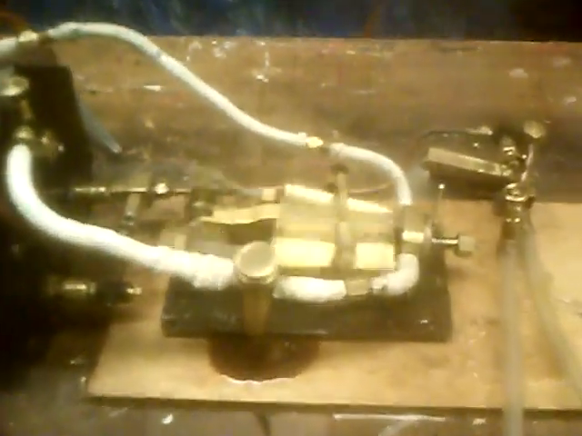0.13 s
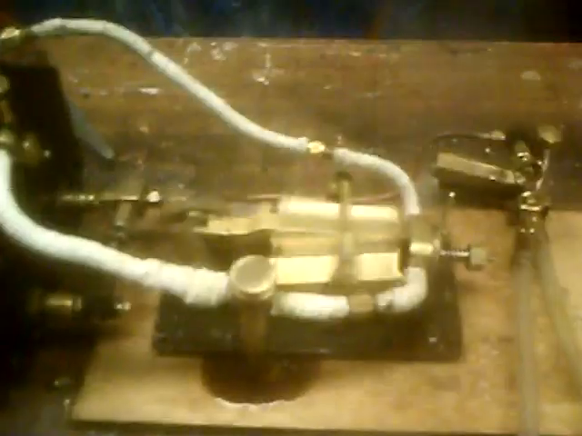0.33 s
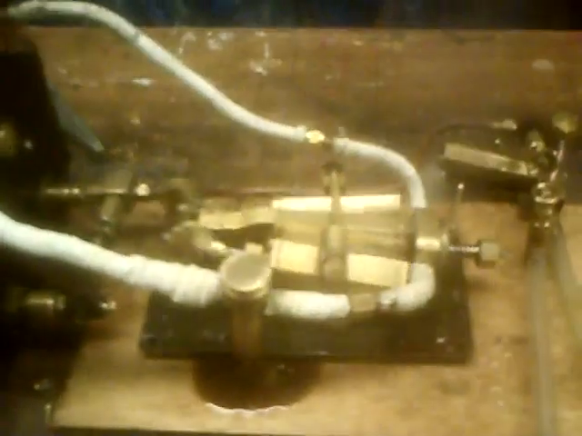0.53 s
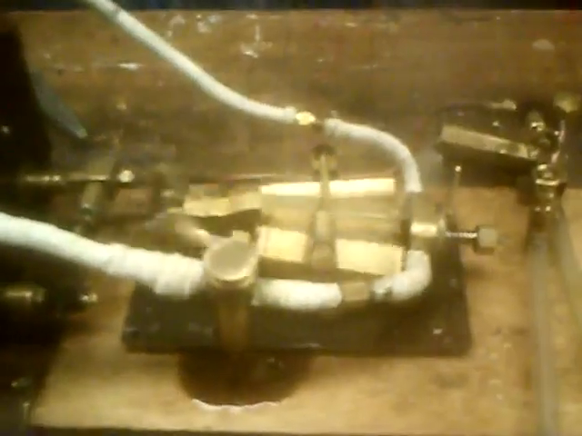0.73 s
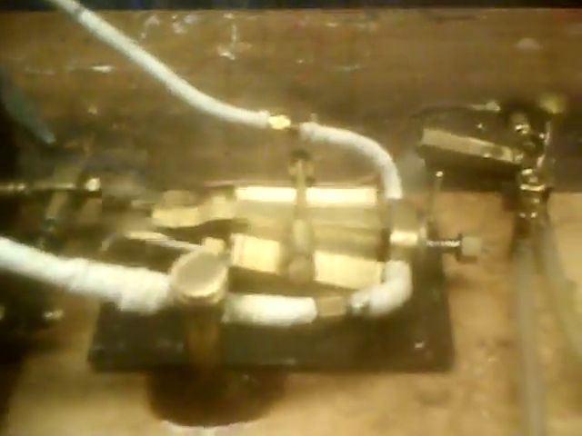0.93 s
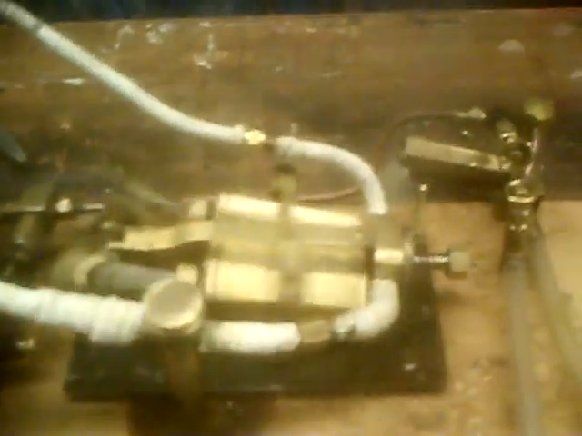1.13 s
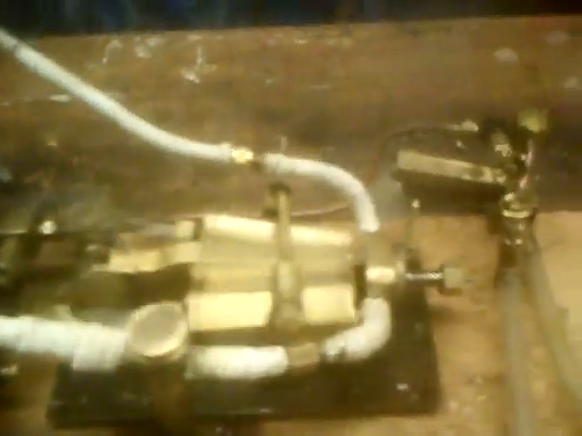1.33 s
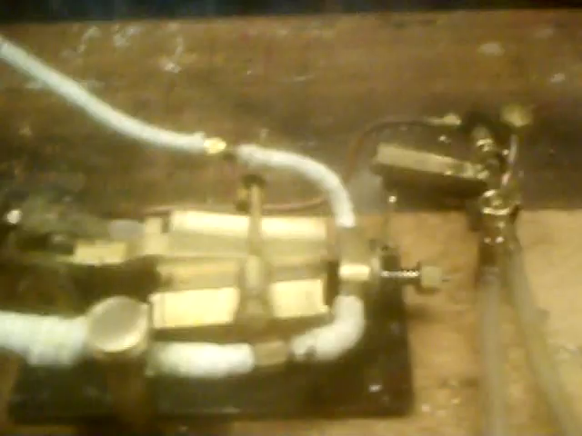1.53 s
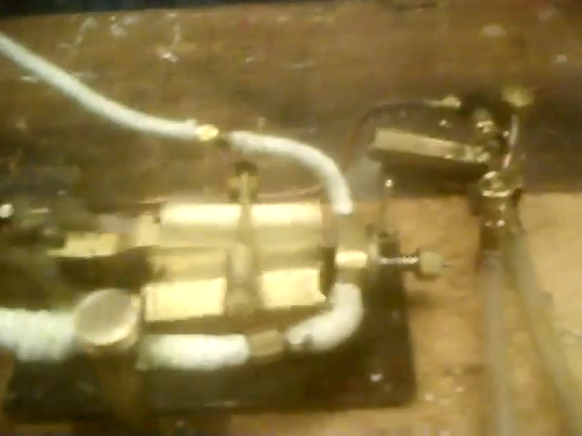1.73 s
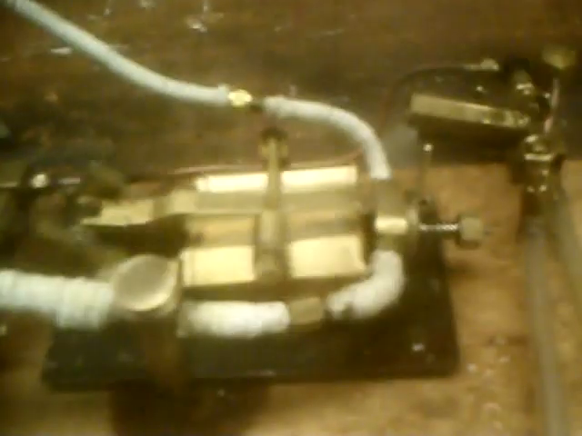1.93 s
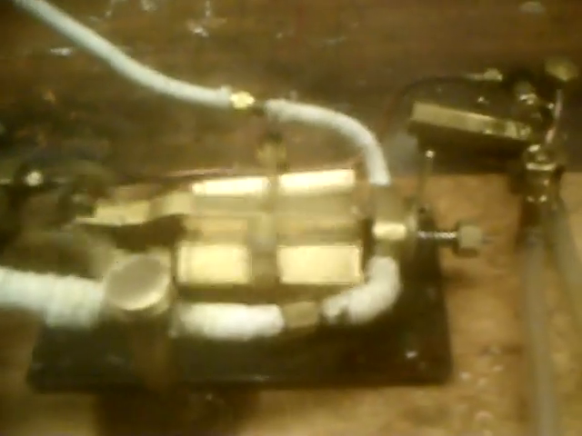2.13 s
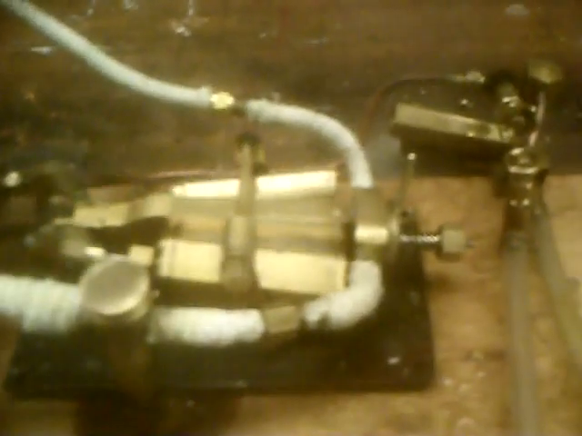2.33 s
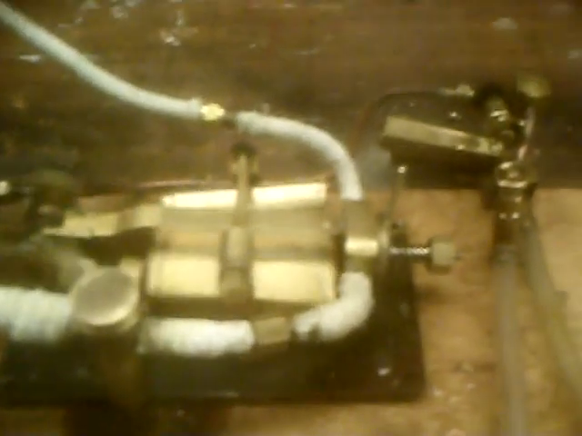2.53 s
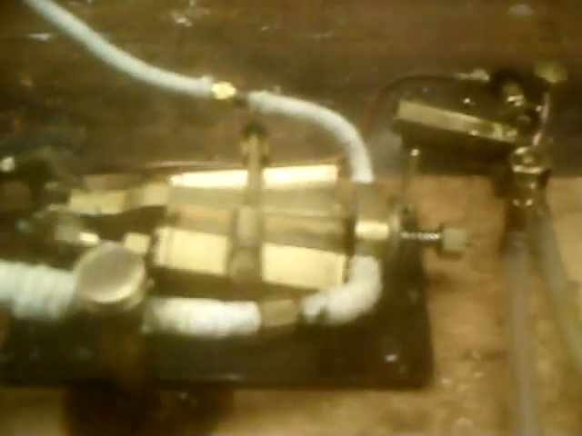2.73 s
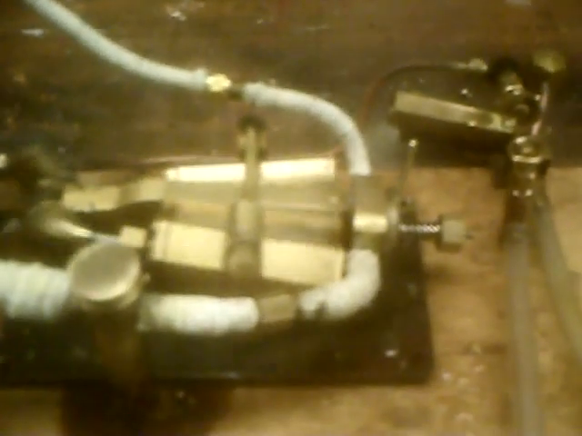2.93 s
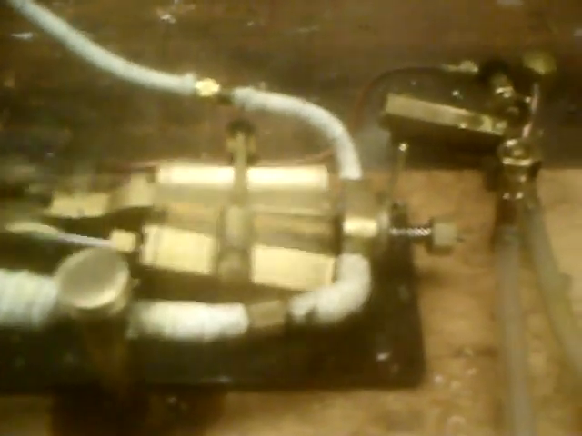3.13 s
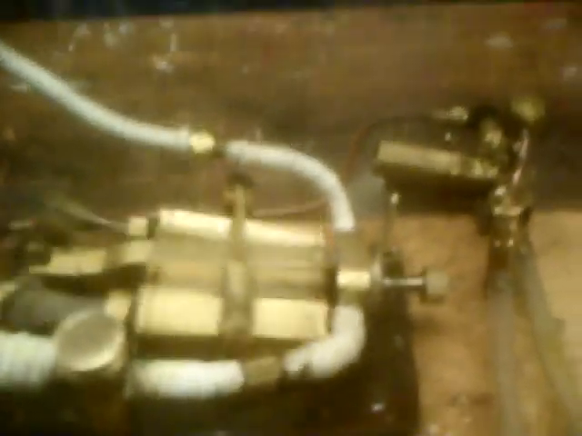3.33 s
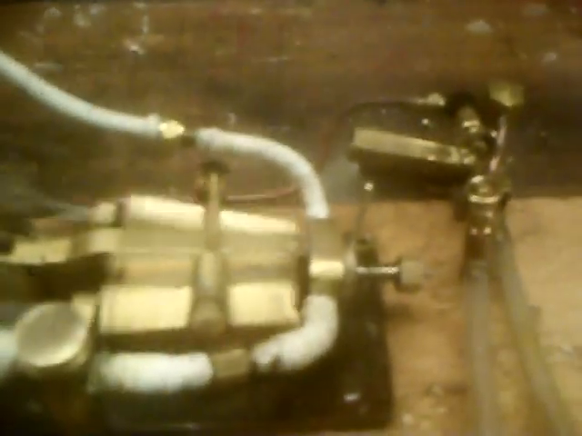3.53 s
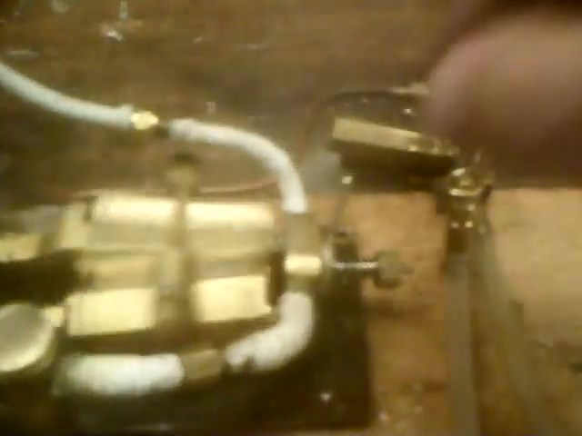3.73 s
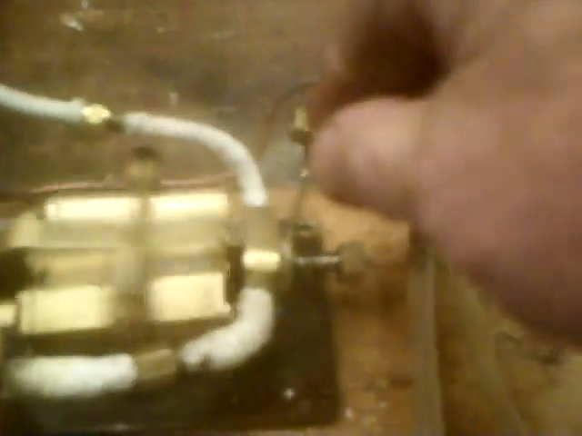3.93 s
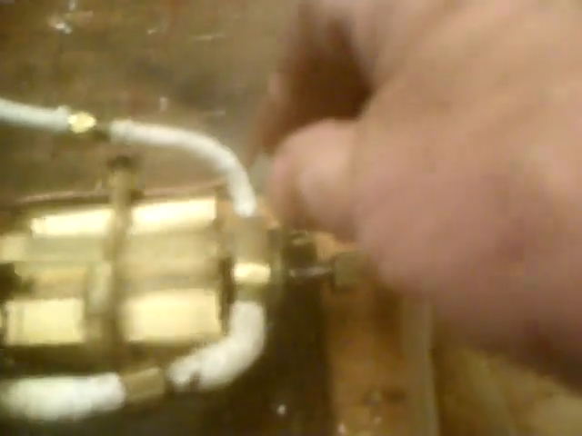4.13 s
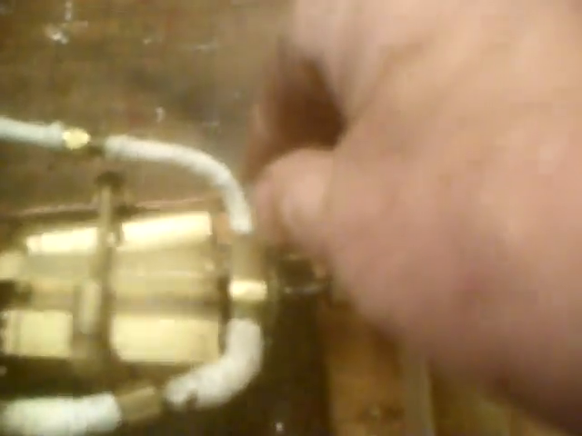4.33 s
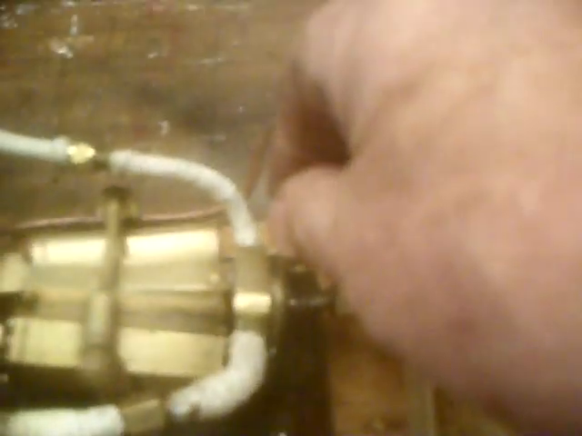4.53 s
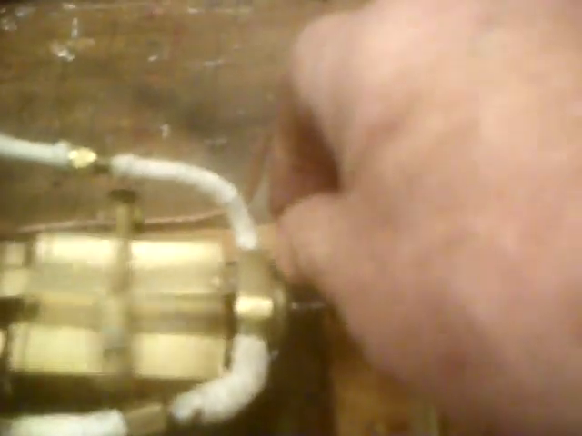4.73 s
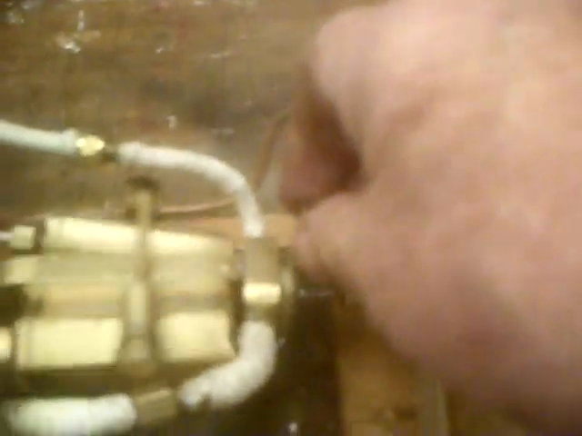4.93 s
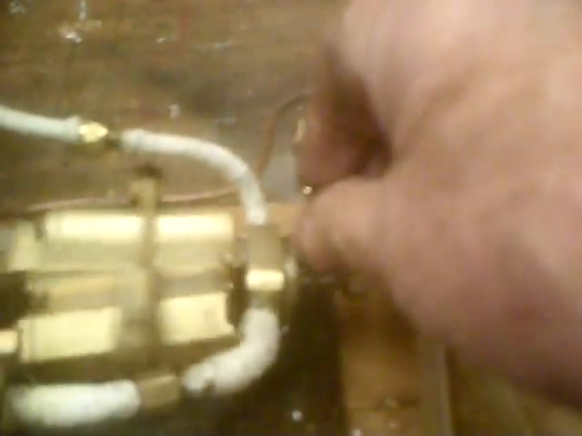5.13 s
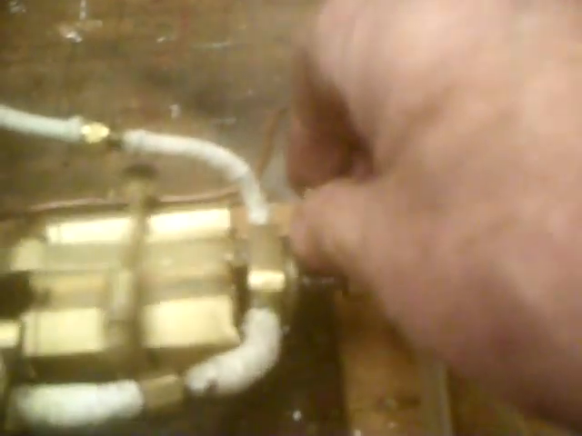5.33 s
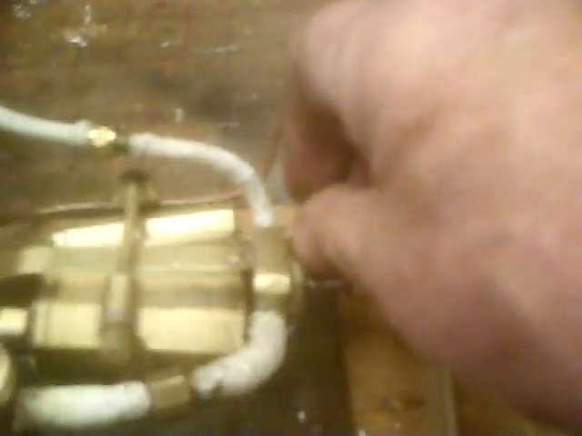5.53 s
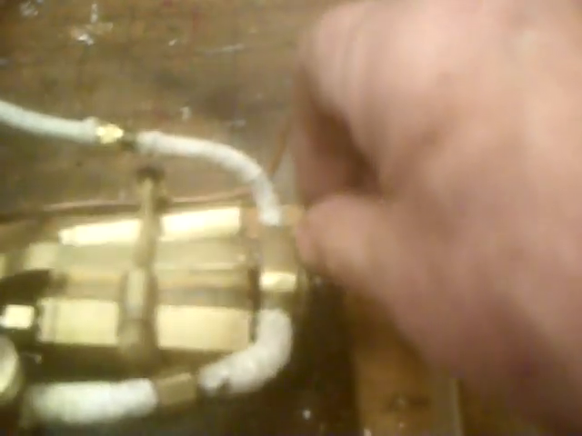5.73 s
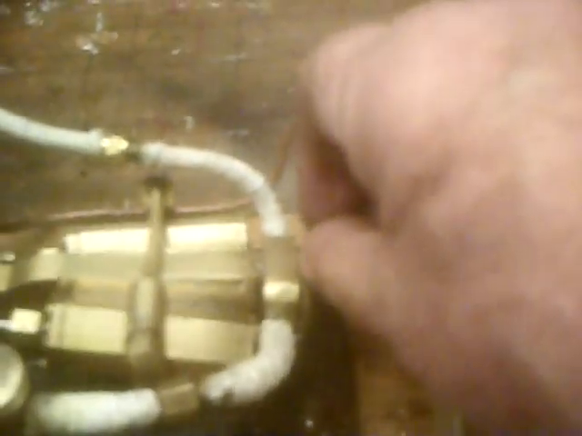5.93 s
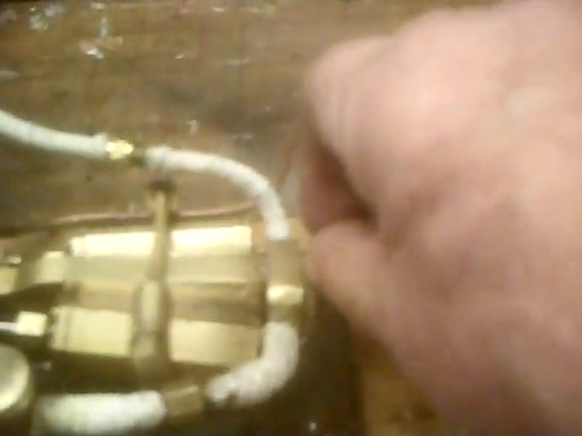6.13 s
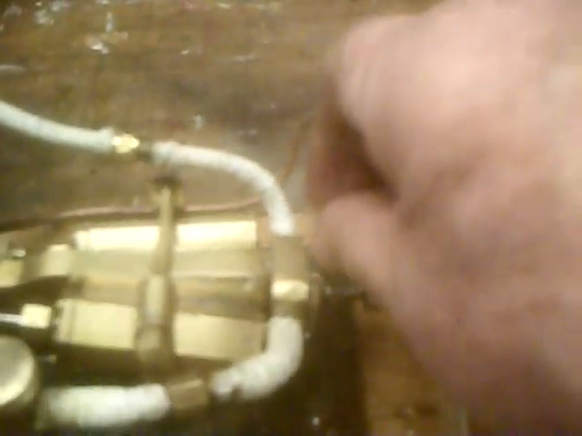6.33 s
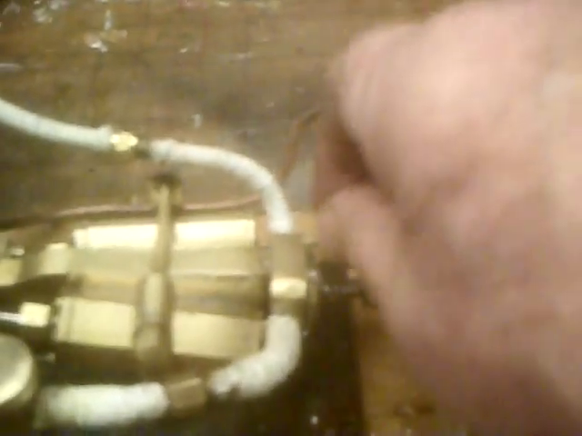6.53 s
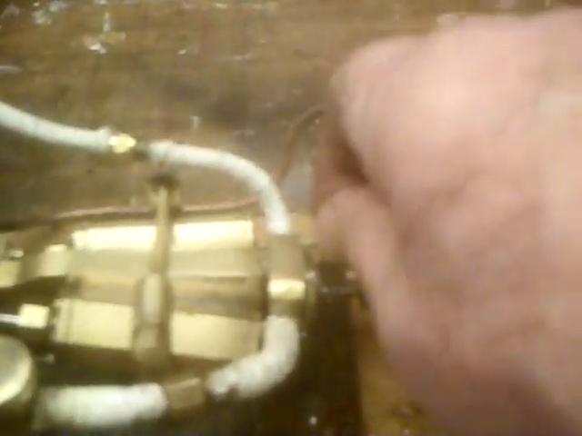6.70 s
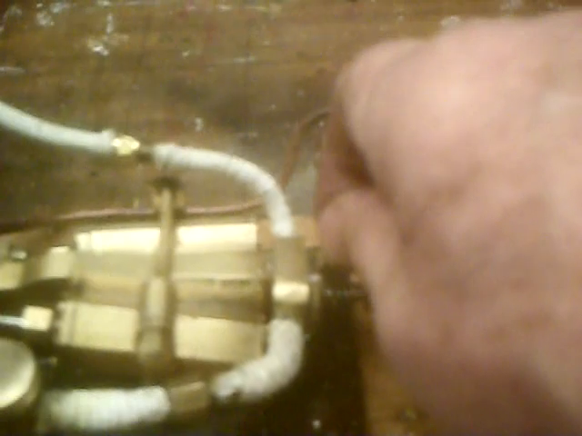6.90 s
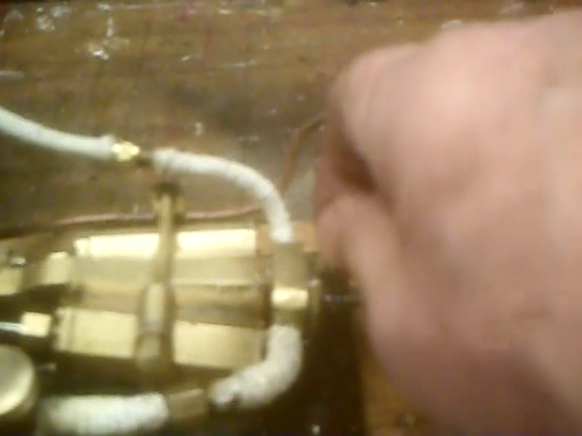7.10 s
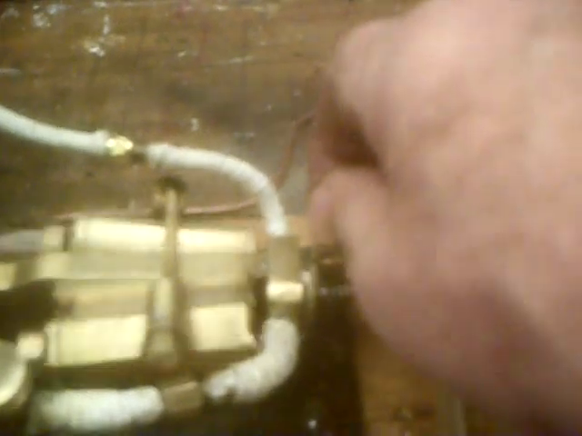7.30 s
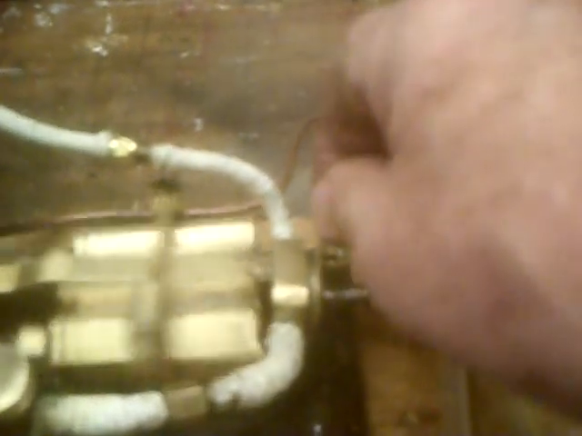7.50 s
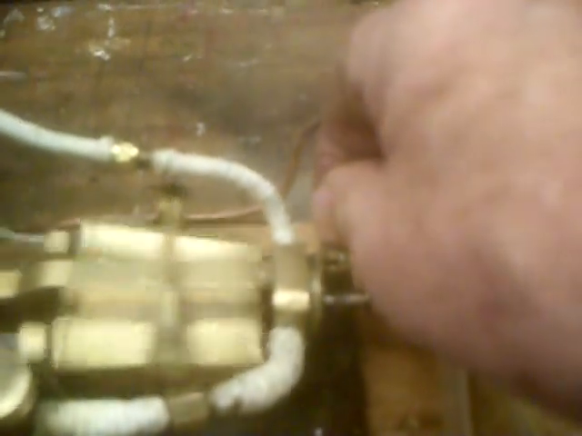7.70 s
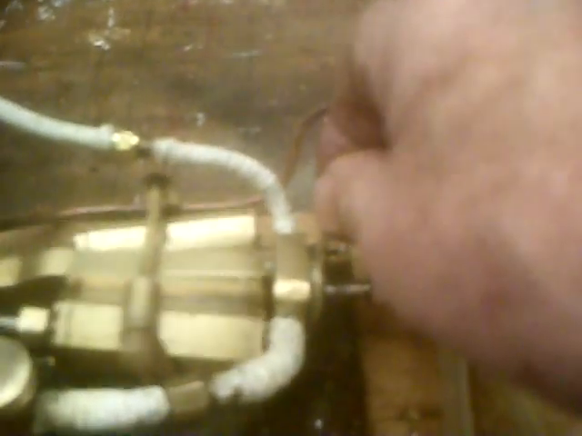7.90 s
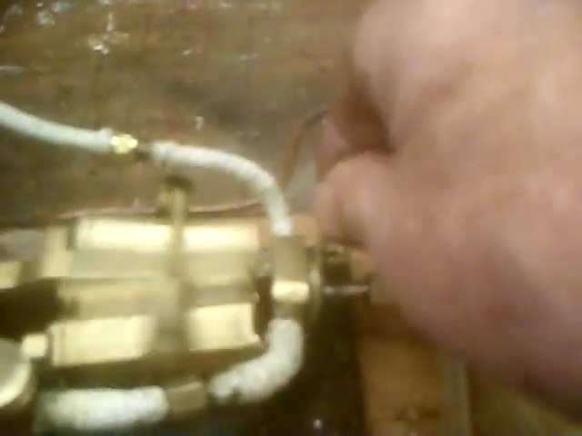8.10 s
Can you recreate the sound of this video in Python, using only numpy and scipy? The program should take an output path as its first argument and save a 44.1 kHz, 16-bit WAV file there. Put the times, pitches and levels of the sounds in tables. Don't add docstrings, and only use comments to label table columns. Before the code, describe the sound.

Close, quick metallic clacking of a toy-sized steam engine stops for faint taps over soft hiss, then resumes as a squeaky, brighter, racing clatter.

```python
import sys
import numpy as np
from scipy import signal
from scipy.fft import rfft, irfft, next_fast_len
from scipy.io import wavfile

SR = 44100
rng = np.random.default_rng(int(sys.argv[2]) if len(sys.argv) > 2 else 0)


def boost(x):
    u = np.asarray(x, float) / 20
    return 10 ** u


def wav_out(sig):
    wavfile.write(sys.argv[1], SR, np.round(np.clip(np.atleast_2d(sig).T, -1, 1) * 32767).astype(np.int16))


N = 364266

# start in seconds, main
# click in dB, main thud in dB, side knock in dB.
TURNS = [(0.1496, -2, -4.5, -0.5), (0.3278, -1.5, -3.5, -4), (0.4995, -2.5, -7, -9), (0.674, -1.5, -6, -5),
         (0.846, 3, -5.5, -0.5), (1.0126, 1, -0.5, -15), (1.1784, -4, -3.5, 1.5), (1.3535, -3.5, 1, -10),
         (1.5344, -0.5, 3.5, -5.5), (1.72, -1.5, 0.5, 3.5), (1.9099, -3.5, -2, -3), (2.095, 1.5, 0.5, 5),
         (2.2743, -1, -1.5, 2.5), (2.4525, -1.5, -1.5, -12.5), (2.6393, 2.5, 1, 0.5), (2.817, 1.5, -2, -4),
         (3, 2, -0.5, 0.5), (3.1779, 1.5, 0, 0), (3.3561, 3, 1.5, 1), (3.532, -2.5, -1, 1.5),
         (3.7131, -1.5, 1, -0.5), (3.897, 4, 1, 0.5), (4.077, 2.5, 2.5, -5), (4.2555, -1.5, 0, -1),
         (4.4345, 0.5, 1, -9), (4.605, -3.5, 2.5, 1.5), (4.778, 3.5, 2.5, 0), (4.9514, 0, 1, -9),
         (5.1261, 0.5, 2.5, -8), (5.297, -0.5, 3, -6),
         (5.4715, -2, 1, -2.5),
    (5.644, -0.5, 3, 2),
    (5.8332, -5.5, 1.5, 0.5),
    (7.49, 0, 5, 2.5),
    (7.645, 1, 4, -1),
    (7.772, -2, -6, 5),
    (7.893, 4.5, -4.5, 5.5),
    (8.02, -7.5, -5.5, 0),
    (8.1458, 1.5, 0.5, 6.5),
    (8.27, 0, 0, -2),
]
# lead on the main knock in turns, click on brass in dB, click on plate in dB,
# thump on bench in dB, thump on plate in dB.
CONTACTS = [
    (.73, -56, -45, -28, -37),
    (.425, -39, -36, -29.5, -36),
    (.25, -39.5, -28, -31, -38),
    (.092, -44.5, -44, -43.5, -54),
    (0.0049, -28, -32.5, -29.5, -31),
]
# start in seconds, click in dB, base plate in dB.
STRAYS = [
    (7.6924, -38.5, -25.5),
    (7.8504, -34, -26),
    (7.9643, -31, -25),
    (8.0032, -32.5, -23),
    (8.073, -28.5, -53),
    (8.1937, -27, -44),
    (8.2147, -36, -31),
]
# time in seconds, level in dB.
DRIVE = [
    [(0, -1), (2.5, 0), (4.6, -0.5), (5.64, .5), (5.86, -4.5), (6.05, -25.5)],
    [(7.3, -21), (7.41, 0), (7.49, -5.5), (7.57, -0.5), (7.65, 5.5), (7.84, 5), (8.26, 5.5)],
]


def crank():
    main_s, click_db, thud_db, side_db = np.transpose(TURNS)
    turn_s = np.diff(main_s, prepend=-1)
    turn_s[turn_s > .5] = .177
    lead, usual_db = np.array(CONTACTS)[:, 0], np.array(CONTACTS)[:, 1:]
    scatter_s, scatter_db = .0012, 2.0
    bench_share = 0.88
    knock_follows = 0.5

    luck = rng.standard_normal((len(main_s), len(lead), 5))
    luck[:, -1, :2] = 0
    times = main_s[:, None] - turn_s[:, None] * lead + scatter_s * luck[..., 0]
    drive_db = np.interp(times, *np.transpose(DRIVE[0] + DRIVE[1])).clip(0)
    db = usual_db + scatter_db * luck[..., 1:]
    db[:, :2] += knock_follows * drive_db[:, :2, None]
    db[:, 2] += side_db[:, None] * [bench_share, 1, bench_share, 1]
    db[:, -1] += np.transpose([click_db, thud_db, bench_share * thud_db, thud_db])

    rows = np.column_stack([times.ravel(), db.reshape(-1, 4)])
    s = rows[:, 0]
    rows = rows[(s < 5.9) | (s > 7.39) & (s < N / SR - .01)]
    return np.vstack([rows[:, :3], STRAYS]), rows[:, [0, 3, 4]]


# pitch in Hz, level in dB, t60 in seconds.
BENCH = [(109.4, -11.5, 0.11), (162, -31, 0.021), (188.6, -6, 0.095), (207, -1, 0.12), (239, -4, 0.15),
         (271.3, -5.5, 0.097), (356, -10, 0.052)]
# pitch in Hz, level in dB, t60 in seconds.
PLATE = [(437, -5.5, 0.032), (509, -6.5, 0.047), (561, -8, 0.042), (659, -0.5, 0.025), (747.3, 3.5, 0.022),
         (846, 2, 0.017), (1010.5, -3.5, 0.078), (1008, -1.5, 0.059), (1108, 2.5, 0.011),
         (1280, -11, 0.077), (1370, -6.5, 0.016)]
# pitch in Hz, level in dB, t60 in seconds.
BRASS = [(1626, -11, 0.11), (1738, -10.5, 0.1), (1900, -4.5, 0.017), (1942, -10.5, 0.089),
         (2074, 7.5, 0.0096), (2336, 4.5, 0.013), (2550, -2, 0.022)]
# pitch in Hz, level in dB, t60 in seconds.
TICK = [(3480, 4, 0.0086), (3884, 4.5, 0.013), (4310, 1.5, 0.016), (4600, -7.5, 0.035)]
# pitch in Hz, level in dB, t60 in seconds.
ROD = [(2990, -11.5, 0.029), (3270, -8, 0.022), (3560, -13, 0.051)]
# pitch in Hz, level in dB, t60 in seconds.
SHEEN = [(4890, 1.5, 0.0089), (5650, -0.5, 0.012), (6220, -2.5, 0.013), (6540, 0, 0.0062),
         (7150, 2.5, 0.012), (8100, 5, 0.0077)]
# start in seconds, level near 3 kHz in dB, level of the top in dB.
CLATTER = [(7.5974, -66, -51.5), (7.645, -48, -57), (7.693, -30.5, -48), (7.7208, -25, -41.5),
           (7.76, -39, -57.5), (7.8235, -39, -48), (7.8494, -46, -46.5), (7.8905, -29, -54.5),
           (7.9022, -40, -51), (7.9708, -47, -48), (8.0057, -37, -53), (8.0294, -45, -55), (8.07, -33, -60),
           (8.0983, -52, -47.5), (8.1276, -32, -54), (8.1444, -39, -49.5), (8.153, -46, -54),
           (8.1935, -36, -50), (8.221, -41, -48)]
LOWS_LATE_S = 0.00411


def knocks(clicks, thumps):
    late_thumps = thumps + [LOWS_LATE_S, 0, 0]
    brass = struck(BRASS, clicks, column=1, bounce_ms=0.913, spread_db=1.5, trim_db=-8.5)
    plate = struck(PLATE, clicks, column=2, bounce_ms=4.695, spread_db=2.1, trim_db=-7.5)
    plate += struck(PLATE[:5], thumps, column=2, bounce_ms=3.1, spread_db=2.0, trim_db=-9.5)
    tick = struck(TICK + SHEEN[:4], clicks, column=1, bounce_ms=1.1, spread_db=3.0, trim_db=-26.0)
    bench = struck(BENCH, late_thumps, column=1, bounce_ms=0.5, spread_db=1.5, trim_db=-12.5, signs=(1,))
    rods = struck(ROD, CLATTER, column=1, bounce_ms=1.99, spread_db=0.0, trim_db=-4.0)
    rods += struck(SHEEN, CLATTER, column=2, bounce_ms=2.6, spread_db=2.5, trim_db=-0.5)
    brass = band(brass, 1647, 2900, order=3)
    plate = band(plate, 425, 1400, order=2)
    tick = band(tick, 3100, 9700, order=1)
    return brass + plate + tick + bench + rods


def struck(modes, rows, column, bounce_ms, spread_db, trim_db, signs=(1, -1)):
    rows, out = np.array(rows), np.zeros(N)
    luck = rng.standard_normal((len(rows), len(modes) + 1))
    strengths = boost(rows[:, [column]] + trim_db + spread_db * luck[:, :-1])
    sounds = strengths @ rings(modes, signs)
    gaps = bounce_ms / 1000 * np.exp(.3 * luck[:, -1])
    for s, gap, sound in zip(rows[:, 0], gaps, sounds):
        add(out, int(s * SR), sound)
        add(out, int((s + gap) * SR), .5 * sound)
    return out + 1e-18


# start in seconds, level in dB, pitch in Hz.
SQUEALS = [(7.5703, -32, 1260), (7.6136, -36, 1220), (7.6925, -18.5, 1300), (7.7, -23, 1280),
           (7.7222, -20.5, 1120), (7.7268, -15, 1320), (7.7596, -27.5, 1330), (7.7802, -36, 1270),
           (7.8248, -25, 1370), (7.837, -26.5, 1220), (7.8657, -24.5, 1300), (7.8903, -23.5, 1310),
           (7.9566, -25, 1370), (7.977, -20, 1303), (8.003, -28, 1370), (8.0352, -28, 1230),
           (8.0692, -23.5, 1280), (8.139, -20.5, 1343), (8.1516, -23.5, 1240), (8.1946, -23, 1320)]


def squeals():
    out, t = np.zeros(N + 600), np.arange(600) / SR
    swell = np.sqrt(np.abs(np.sin(np.pi * np.clip(t / 0.0065, 0, 1))))
    for (s, db, hz), phase in zip(SQUEALS, rng.uniform(0, 2 * np.pi, len(SQUEALS))):
        tone = np.sin(2 * np.pi * hz * t + phase)
        tone += boost(-21.0) * np.sin(2 * np.pi * 2.21 * hz * t)
        start = int(s * SR)
        out[start:start + len(t)] += boost(db - 2.5) * swell * tone
    return band(out[:N] + 1e-18, 900, 4000, order=2)


def loose_parts(clicks, thumps):
    by_thumps = shaken(thumps, column=2, settle_ms=16, calm=.55)
    by_clicks = shaken(clicks, column=1, settle_ms=14, calm=1.0)
    loose = rattle(BENCH, body=0, stirred=np.ones(N), per_s=300, spread_db=2.5, trim_db=-5)
    loose += rattle(PLATE, body=1, stirred=by_thumps, per_s=900, spread_db=3.0, trim_db=3.0)
    loose += rattle(BRASS + ROD[:2], body=2, stirred=by_clicks, per_s=600, spread_db=5.5, trim_db=-3.5)
    loose += rattle(TICK + SHEEN, body=2, stirred=by_clicks, per_s=1300, spread_db=5.0, trim_db=-13.0)
    return loose


def shaken(rows, column, settle_ms, calm):
    rows, jolts = np.array(rows), np.zeros(N)
    jolts[(rows[:, 0] * SR).astype(int)] = boost(.5 * rows[:, column])
    decay = np.exp(-1000 / (settle_ms * SR))
    stir = signal.lfilter([1], [1, -decay], jolts + 1e-9)
    return calm + stir / np.mean(stir)


def rattle(modes, body, stirred, per_s, spread_db, trim_db):
    sizes = boost(spread_db * np.minimum(rng.exponential(1, N), 4)) * rng.choice([-1, 1], N)
    force = sizes * (rng.random(N) < per_s / SR) * stirred
    sound = signal.oaconvolve(force, rings(modes, (1, -1)).sum(axis=0))[:N]
    return rms_one(sound) * running(body) * boost(trim_db)


LOOSE_DB = [-40.5, -50, -56]


def running(body):
    t = np.arange(N) / SR
    drive = sum(boost(np.interp(t, *np.transpose(run), -100, -100)) for run in DRIVE)
    return drive * boost(LOOSE_DB[body])


# start in seconds, level in dB, pitch in Hz, ring t60 in seconds.
PINGS = [
    (3.247, -42.5, 3200, 0.017),
    (3.2673, -45, 4600, 0.011),
    (3.2874, -51, 3370, 0.015),
]


def pings():
    return boost(1.5) * single_rings(PINGS)


# start in seconds, push in dB, pitch in Hz, ring t60 in seconds, tap in dB.
NUDGES = [
    (5.939, -47, 246, 0.021, -55),
    (6.008, -50, 200, 0.03, -67),
    (6.058, -42.5, 322, 0.017, -53),
    (6.245, -46.5, 262, 0.026, -57),
    (6.373, -42, 313, 0.018, -50),
    (6.53, -54, 207, 0.056, -73),
    (7.068, -43, 252, 0.056, -55),
    (7.201, -44, 312, 0.015, -49.5),
    (7.331, -42, 312, 0.022, -51),
]


def nudges():
    push = single_rings([(s + LOWS_LATE_S, db + 7.5, hz, t60) for s, db, hz, t60, tap_db in NUDGES])
    tap = single_rings([(s + 0.00499, tap_db + 11.0, 900.0, .006) for s, db, hz, t60, tap_db in NUDGES])
    return push + tap


def single_rings(rows):
    out = np.zeros(N)
    for s, db, hz, t60 in rows:
        add(out, int(s * SR), rings([(hz, db, t60)], (1,))[0])
    return out


def room(x):
    t60_s, dull_hz = 0.34, 3000
    size = next_fast_len(N + SR // 2)
    w = 2 * np.pi * np.arange(size // 2 + 1) / size
    dull = 1 / (1 + 1j * w * SR / (2 * np.pi * dull_hz))
    response = 0
    for k, lag_s in enumerate(rng.uniform(.008, .03, 6)):
        loop = boost(-60 * lag_s / t60_s) * dull * np.exp(-1j * w * lag_s * SR)
        response = response + (-1) ** k * loop / (1 - loop)
    return irfft(rfft(x, size) * response, size)[:N]


def shake():
    low = band(rng.standard_normal(N), 72, 134, order=2)
    return boost(-60.5) * rms_one(low) * rms_one(running(body=0))


# frequency in Hz, density in dB per Hz.
HISS = [(12, -29.5), (20, -5.5), (65, -2.5), (119, -14), (156, -5.5), (173, -10), (859, -18), (1650, -20.5),
        (2170, -22), (2720, -19.5), (2930, -22), (5360, -22.5), (8000, -22.5), (10400, -52), (17600, -120)]


def hiss():
    hz, db = np.transpose(HISS)
    grid = np.clip(np.arange(N // 2 + 1) * SR / N, 1, 7400)
    colour = boost(np.interp(np.log(grid), np.log(hz), db))
    return boost(-55) * rms_one(irfft(rfft(rng.standard_normal(N)) * colour, N))


def rings(modes, signs):
    t = np.arange(6000) / SR
    out = []
    for k, (hz, db, t60) in enumerate(modes):
        out.append(signs[k % len(signs)] * boost(db - 60 * t / t60) * np.sin(2 * np.pi * hz * t))
    return np.array(out)


def add(out, sample, sound):
    out[sample:sample + len(sound)] += sound[:max(N - sample, 0)]


def band(x, low_hz, high_hz, order):
    return signal.sosfilt(signal.butter(order, [low_hz, high_hz], "band", fs=SR, output="sos"), x)


def rms_one(x):
    return x / np.sqrt(np.mean(x ** 2) + 1e-20)


def scene():
    clicks, thumps = crank()
    engine = knocks(clicks, thumps) + squeals() + loose_parts(clicks, thumps) + pings() + nudges()
    engine = signal.sosfilt(signal.butter(3, 135, "high", fs=SR, output="sos"), engine)
    return (engine + boost(-17) * room(engine) + shake() + hiss())[None]


def band_limit(x):
    return signal.sosfilt(signal.butter(12, 8870, fs=SR, output="sos"), x)


def record(dry):
    top_cut = signal.butter(14, 7624, fs=SR, output="sos")
    mix = signal.sosfilt(top_cut, np.clip(dry, -1, 1))
    return band_limit(mix)


dry = scene()
out = record(dry)
wav_out(out)
```